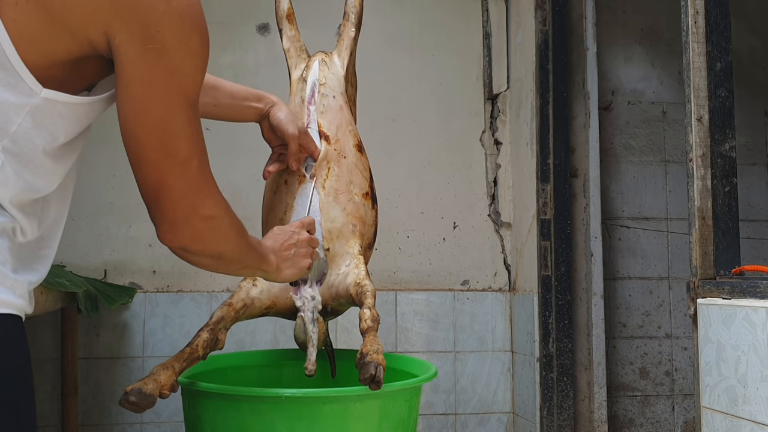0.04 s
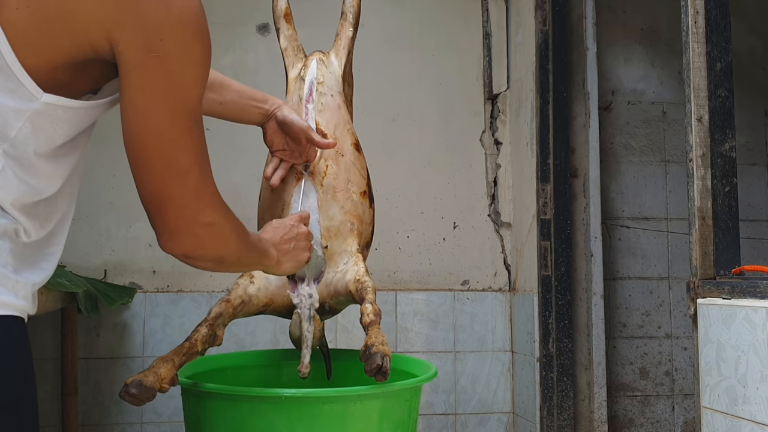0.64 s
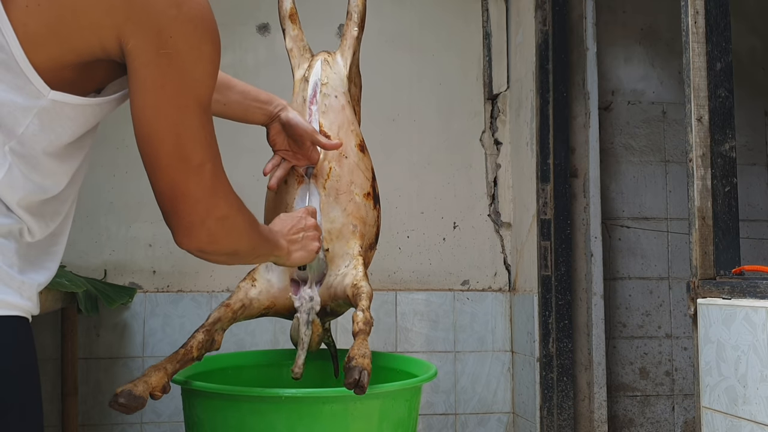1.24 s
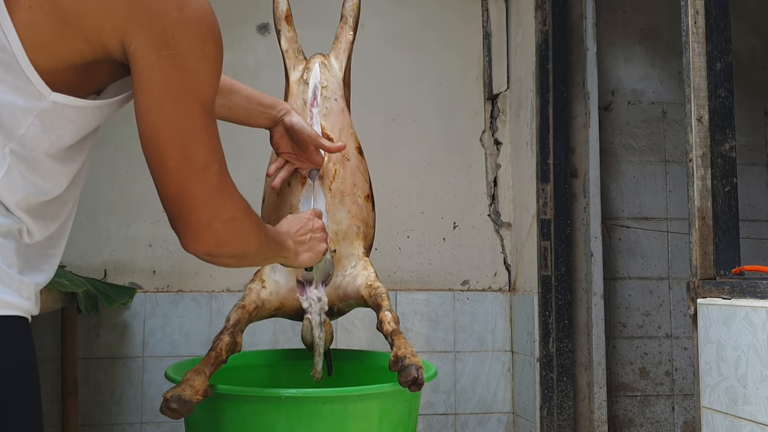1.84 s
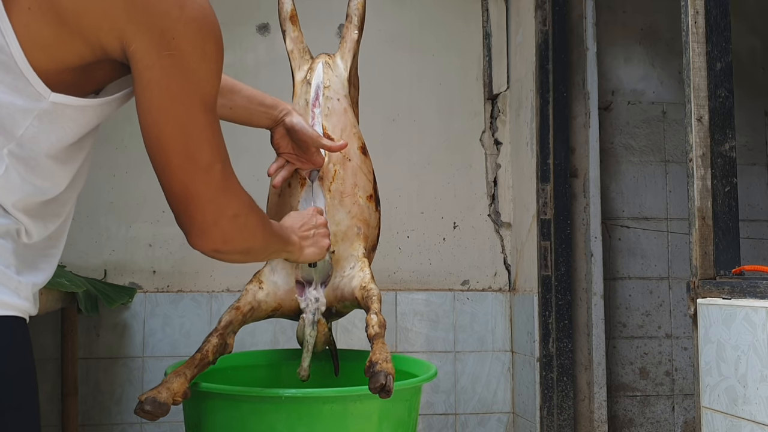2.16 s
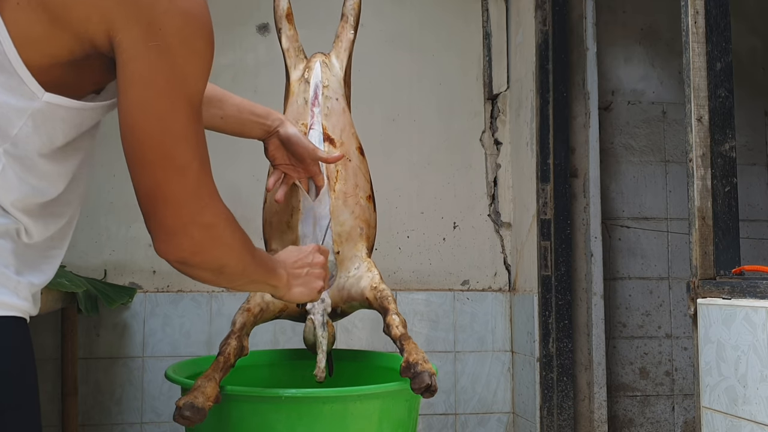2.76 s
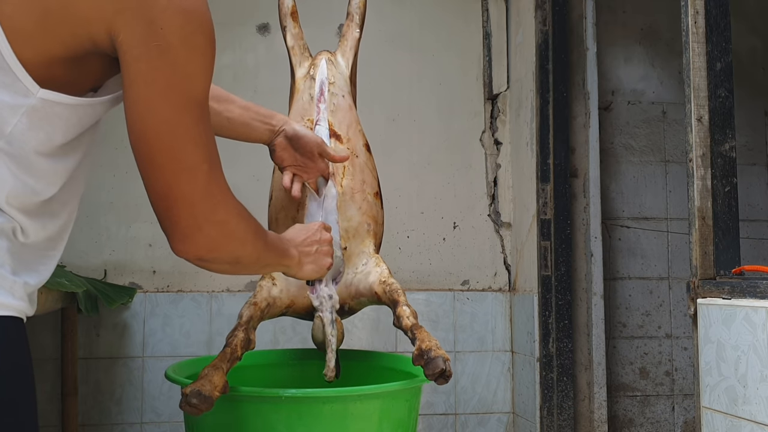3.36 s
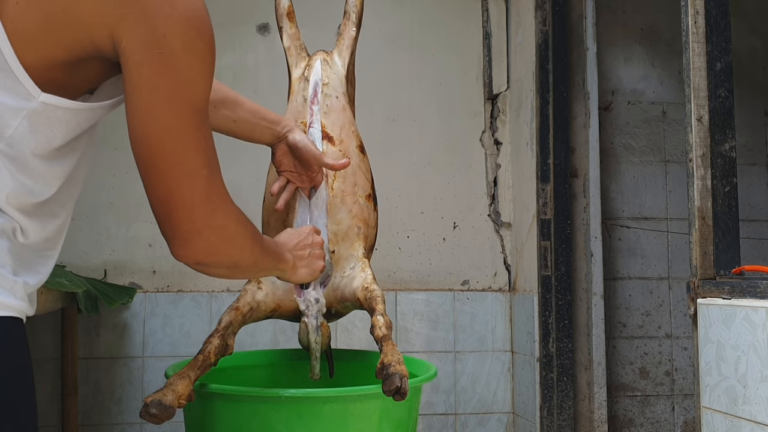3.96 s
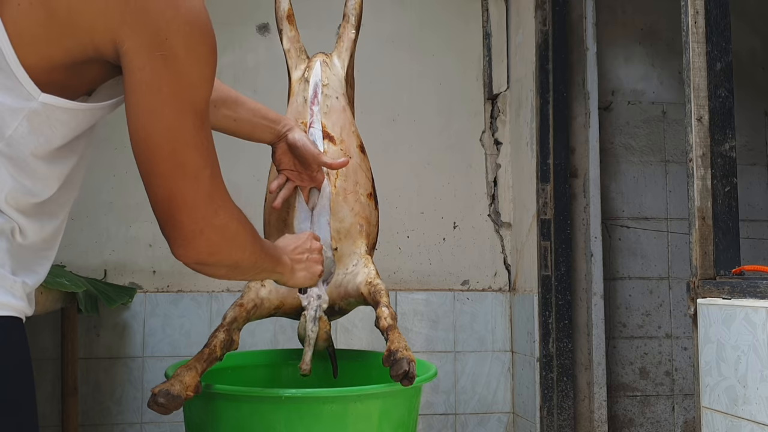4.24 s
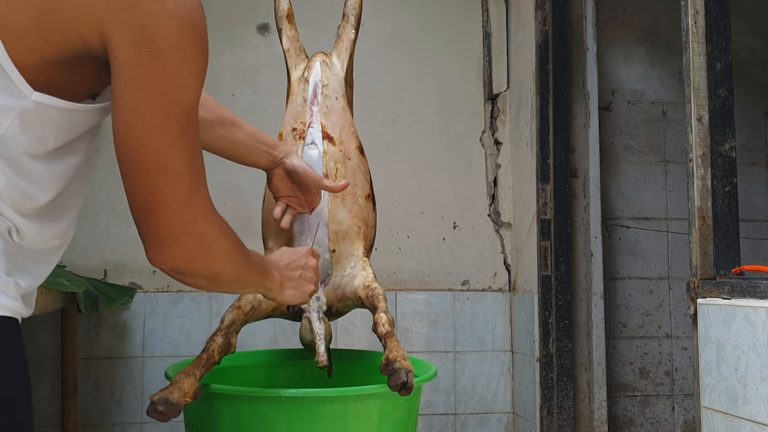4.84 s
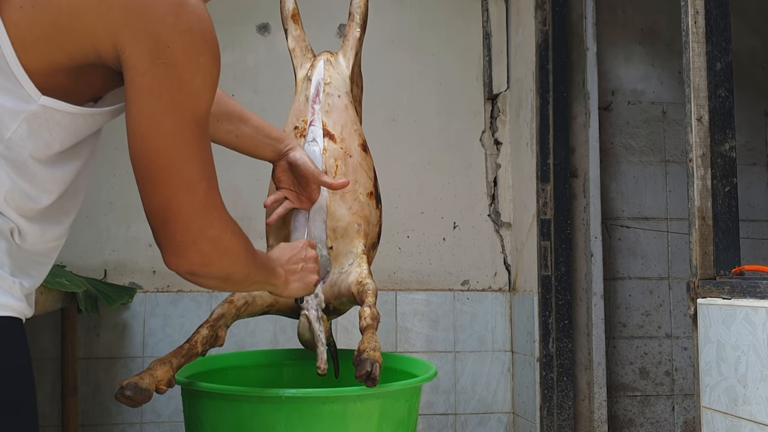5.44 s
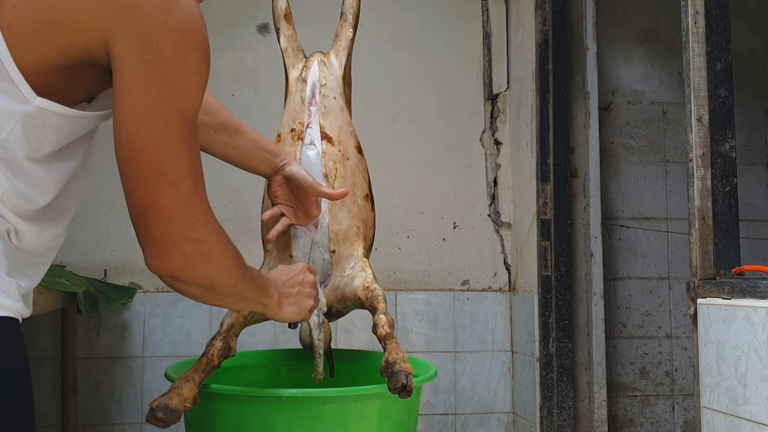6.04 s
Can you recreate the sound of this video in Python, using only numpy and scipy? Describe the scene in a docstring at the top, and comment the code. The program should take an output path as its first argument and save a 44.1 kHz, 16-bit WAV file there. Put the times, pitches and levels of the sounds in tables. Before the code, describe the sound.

A knife slits the hide of a hanging carcass in short, scratchy, slightly squeaky strokes with pauses between. Wet tissue ticks close to the microphone and a hand faintly brushes the damp coat. Midway the carcass takes one dull knock; then come two sharper tears, with a sinew popping between them. The small tiled yard adds a brief echo, and distant traffic drones low throughout.

```python
"""A small tiled yard, where a knife slits the belly hide of a hanging goat carcass, heard in stereo.
Each pull snaps a swarm of hairs and fibres that ring the blade and the opened hide; between pulls a hand
brushes the damp coat. Wet tissue ticks straight at the microphone, the carcass takes one dull knock
and a sinew gives way. The near walls answer every stroke, over the low drone of distant traffic."""
import sys
import numpy as np
from scipy import signal
from scipy.fft import rfft, irfft, next_fast_len
from scipy.io import wavfile

SR = 44100
rng = np.random.default_rng(int(sys.argv[2]) if len(sys.argv) > 2 else 0)


def store_pcm(level_fs):
    """Save levels as 16-bit WAV."""
    pcm = np.round(np.clip(level_fs, -1, 1) * 32767).astype(np.int16)
    wavfile.write(sys.argv[1], SR, np.atleast_2d(pcm).T)


N = 273861

# The deep drone of distant traffic. Each row: time in seconds, level in dB.
TRAFFIC_LEVEL = [(0.0, -44.5), (0.5, -53), (0.81, -42.5), (1.38, -51.5), (1.5, -68), (1.61, -47.5),
                 (2.13, -55), (2.27, -61.5), (2.32, -46.5), (2.52, -56.5), (2.7, -40.5), (2.87, -65.5),
                 (2.99, -47.5), (3.37, -58.5), (4.1, -50.5), (4.19, -43), (4.34, -54), (4.93, -54),
                 (5.03, -38.5), (5.26, -59), (5.31, -48), (6.11, -56), (6.14, -47.5), (6.21, -58.5)]
# A second engine drawing nearer. Each row: time in seconds, level in dB.
ENGINE_LEVEL = [(0.0, -60.5), (0.17, -69), (3.58, -58.5), (3.67, -72), (3.96, -57), (5.45, -54),
                (6.21, -61)]
# That engine's two beating notes. Each row: pitch in Hz, width in Hz, relative level in dB.
BEATING_NOTES = [(87.84, 3.3, -3.5), (92.22, 2.21, -1)]
# The roar of the far road. Each row: frequency in Hz, relative spectral level in dB.
ROAD_SPECTRUM = [(15, -22), (28, 13.5), (39, 23), (50, 16), (80, 6), (110, 1.5), (132, 8), (162, -1.5),
                 (195, -1), (330, -5), (450, -11), (900, -14.5), (1100, -22.5), (1500, -24), (3000, -52)]
# Faint steady hiss. Each row: frequency in Hz, relative spectral level in dB.
HISS_SPECTRUM = [(1000, -4), (2500, -1), (5000, -7.5), (7000, -4.5), (8200, -3.5), (9000, -18.5),
                 (15500, -12.5)]
# The blade slides over the hide, mostly just before it bites. Each row: start, rise and hold in seconds,
# force in dB, squeak pitch in Hz, relative squeak level in dB.
BLADE_SLIDES = [(0.122, .01, .06, -88.5, 1563, 9), (0.185, 0.0046, 0.0237, -70, 4578, 17),
                (0.209, 0.0054, 0.018, -69, 3827, 20.5), (0.99, 0.0205, 0.0895, -74, 1490, -5),
                (1.646, 0.041, 0.0252, -58.5, 1530, -4.5), (2.221, 0.0228, 0.0305, -63.5, 1580, 0),
                (2.492, 0.0516, 0.0284, -62.5, 1843, -11), (4.224, 0.00132, 0.025, -54, 1942, 5.5),
                (5.628, 0.0015, 0.0075, -53, 1810, -1), (5.753, 0.0065, 0.0312, -65, 1765, -16.5)]
# The pocket under the hide. Each row: multiple of its pitch, relative gain in dB.
POCKET_MODES = [(.8, -15.5), (0.998, 25.5), (1.178, -18.5)]
# The stretched hide, ringing with the pocket. Each row: frequency in Hz, width in Hz, gain in dB.
HIDE_MODES = [(1734.5, 35, -2), (2051, 51, -5)]
# The taut cut edge of the hide. Each row: frequency in Hz, width in Hz, relative gain in dB.
CUT_EDGE_MODES = [(2537, 450, -7.5), (3035, 170, -6.5), (3662, 290, -2), (4680, 200, -11)]
# The thin blade singing. Each row: frequency in Hz, width in Hz, relative gain in dB.
BLADE_MODES = [(4258, 293, 5.5), (6904, 830, -5)]
# The fizz of breaking hairs. Each row: frequency in Hz, relative spectral level in dB.
FIZZ_SPECTRUM = [(300, 14.5), (1000, -25.5), (2000, -14.5), (4500, 2.5), (5700, -2.5), (7500, 4),
                 (9200, -6.5), (11000, -3), (15500, -8.5)]
# The knife bites and tears through. Each row: start, rise and hold in seconds, fade over the hold in dB,
# force in dB, pocket pitch in Hz, relative pocket level in dB, rasp centre in Hz, relative fizz in dB.
KNIFE_CUTS = [(0.197, 0.01225, 0.0377, 10.5, -44, 1522, -4, 3210, -25),
              (1.354, 0.0418, 0.0295, 1.5, -64, 1798, 12, 2880, 1.5),
              (1.682, 0.0042, 0.0508, -3.5, -61.5, 1655, 8, 3200, -6.5),
              (1.941, 0.0207, 0.0339, 6.5, -62.5, 1625, 12, 3040, -3),
              (2.288, 0.00256, 0.0497, 15.5, -55.5, 1740, -1, 3555, 0.5),
              (2.507, 0.0527, 0.0284, 0.5, -69, 1776, -9, 4640, 8.5),
              (4.252, 0.0069, 0.0282, 10, -46.5, 1952, 10, 2470, 1),
              (4.276, 0.0152, 0.0199, 15, -45.5, 1934, -8.5, 3820, -5),
              (4.736, 0.0033, 0.07, 8.5, -61, 1330, 0.5, 4750, -5),
              (5.647, 0.0046, 0.0257, 5.5, -44.5, 1837, -4.5, 3690, -3),
              (5.676, 0.0387, 0.0242, 3.5, -53.5, 1905, -2, 3510, -5.5)]
# The hand shifts on the coat. Each row: start and length in seconds, force in dB, rasp centre in Hz.
HAND_RUBS = [(0.536, 0.123, -86.5, 11300), (2.695, 0.065, -83, 11700), (3.435, 0.3036, -79, 3140),
             (3.783, .014, -69.5, 4290), (3.942, 0.175, -79, 2370), (5.953, 0.038, -78.5, 3924)]
# Wet tissue snapping. Each row: start in seconds, relative strength in dB, pitch in Hz, width in Hz.
TISSUE_SNAPS = [(1.384, -37.5, 1830, 900), (1.685, -24.5, 1563, 348), (1.734, -31, 2400, 2500),
                (2.294, -43.5, 2400, 2500), (3.085, -29, 1446, 450), (3.295, -42.5, 1212, 600),
                (3.469, -42.5, 800, 298), (4.183, -40, 8290, 2510), (4.267, -32, 1950, 1800),
                (4.277, -20.5, 2120, 2190), (4.734, -18, 114.4, 60), (5.007, -57.5, 11200, 4000),
                (5.42, -37, 6680, 1770), (5.708, -23.5, 3610, 1500)]
# Belly air under the knock. Each row: start in seconds, level in dB, pitch in Hz, press in seconds.
BELLY_BOOMS = [(3.05, -50, 357.7, 0.0112), (3.062, -45.5, 319.6, 0.02616)]
# The knock on the carcass and its rebound. Each row: start in seconds, relative strength in dB.
CARCASS_KNOCKS = [(3.051, -34.5), (3.057, -26), (3.077, -36.5)]
# The ring of ribs and skin. Each row: frequency in Hz, width in Hz, relative level in dB.
RIB_MODES = [(606, 240, -16), (966, 86, -11), (1295, 190, -7), (1620, 330, -33.5), (2160, 730, -20.5),
             (2650, 170, -36)]
# The slap on wet skin. Each row: frequency in Hz, relative spectral level in dB.
SLAP_SPECTRUM = [(300, 2.5), (1500, 1), (3000, 6), (4000, -4.5), (7000, 0), (9300, -12), (12000, -3),
                 (15500, -11.5)]
# A sinew gives way in jerks. Each row: start in seconds, relative strength in dB.
SINEW_POPS = [(4.741, -41.5), (4.75, -37), (4.782, -25.5)]
# The ring of the sinew. Each row: frequency in Hz, width in Hz, relative level in dB.
SINEW_MODES = [(1268, 390, -5), (2865, 680, -5.5), (4790, 640, -4.5), (5760, 2180, -2.5), (6940, 1550, 2)]
# The yard's reverberation. Each row: frequency in Hz, time to fall 60 dB in seconds.
YARD_DECAY = [(300, 0.52), (1500, 0.2996), (4000, 0.2712), (8000, 0.2385), (15000, 0.2145)]
# The cutting's tone on the microphone's left side. Each row: frequency in Hz, gain over the right in dB.
LEFT_TONE = [(300, -2), (1000, -1.5), (1800, 1.5), (4000, -2), (8000, 2), (15000, 0)]


def amp(db):
    """Decibels to gain."""
    return 10 ** (np.asarray(db) / 20)


def unit(x):
    """Scales to rms 1."""
    return x / np.sqrt(np.mean(x ** 2) + 1e-20)


def at_frequency(points, hz):
    """A table read on a log-frequency axis."""
    table_hz, value = np.transpose(points)
    return np.interp(np.log(hz + 1), np.log(table_hz + 1), value)


def curve(rows):
    """A table of times and values, read at every sample."""
    return np.interp(np.arange(N) / SR, *np.transpose(rows))


def colour(x, points):
    """Shapes x with a spectrum in dB."""
    size = next_fast_len(x.shape[-1])
    gain = amp(at_frequency(points, np.fft.rfftfreq(size, 1 / SR)))
    return irfft(rfft(x, size) * gain, size)[..., :x.shape[-1]]


def resonate(x, hz, width):
    """A two-pole resonance of gain 1."""
    return signal.lfilter(*signal.iirpeak(min(hz, SR * .45), hz / width, SR), x)


def band(x, hz, width):
    """A resonance applied twice, for steep skirts."""
    return resonate(resonate(x, hz, width), hz, width)


def glide(x, hz, width):
    """A resonance that follows the curve hz, with steep skirts."""
    turn = np.exp(2j * np.pi * np.cumsum(hz) / SR)
    pole = np.exp(-np.pi * width * 1.5 / SR)
    return 2 * (turn * signal.lfilter([(1 - pole) ** 2], [1, -2 * pole, pole * pole], x / turn)).real


def play(source, rows):
    """One track with a sound for each row, placed at the row's start time."""
    track = np.zeros(N)
    for start, *settings in rows:
        sound = source(*settings)
        span = track[round(start * SR):][:len(sound)]
        span += sound[:len(span)]
    return track


def drone(hz, width, steadiness):
    """A narrow wavering band of engine rumble; steadiness evens out its swells."""
    noise = band(rng.standard_normal(N + SR), hz, width)
    rumble = signal.hilbert(noise, next_fast_len(N + SR))[SR:SR + N]
    power = abs(rumble) ** 2
    return unit(rumble.real / (power + .1 * np.mean(power)) ** (steadiness / 2))


def traffic(rise_db_per_s=1.3482):
    """Far engines in the centre, diffuse road roar whose upper range slowly grows, and faint hiss."""
    beating = sum(amp(db) * drone(hz, width, steadiness=0.36) for hz, width, db in BEATING_NOTES)
    deep = drone(hz=69, width=7.49, steadiness=0.738)
    engines = amp(curve(TRAFFIC_LEVEL)) * deep + amp(curve(ENGINE_LEVEL)) * beating
    mid, side = rng.standard_normal((2, N))
    side = colour(side, [(40, -13.5), (130, -10), (300, -10.5), (600, -5.5), (1200, 2)])  # narrow bass
    roar = unit(colour(np.array([mid + side, mid - side]), ROAD_SPECTRUM))
    bass = signal.sosfiltfilt(signal.butter(2, 330, fs=SR, output="sos"), roar)
    growth = amp(-1.5 + rise_db_per_s * np.arange(N) / SR)
    hiss = unit(colour(rng.standard_normal((2, N)), HISS_SPECTRUM))
    return engines + amp(-56.5) * (bass + growth * (roar - bass)) + amp(-83) * hiss


def pull(rise, hold, fade_db, force_db, pocket_hz, pocket_width, pocket_db, rasp_hz, rasp_db, blade_db,
         fizz_db, fibres_per_s=2400, spread_db=5.5, release_s=0.0091, octaves_per_s=0.57):
    """Fibres snap one by one and ring the hide pocket, the cut edge and the blade."""
    t = np.arange(int((rise + hold) * SR) + 2048) / SR
    held = np.clip((t - rise) / hold, 0, 1)
    release = np.exp(-np.maximum(t - rise - hold, 0) / release_s)
    force = np.minimum(t / rise, 1) * amp(-fade_db * held) * release
    chance, size, sign = rng.random((len(t), 3)).T
    strength = amp(spread_db * np.minimum(-np.log(size), 4))
    breaks = (chance < fibres_per_s / SR) * np.sign(sign - .5) * strength
    friction = 0.39 * rng.standard_normal(len(t))
    thin_flap = signal.butter(6, 1150, "high", fs=SR, output="sos")  # a thin flap radiates no bass
    drive = signal.sosfilt(thin_flap, force * (unit(breaks) + friction))
    # The hide tightens as the blade advances.
    pitch = pocket_hz * 2 ** (octaves_per_s * (t - (rise + hold) / 2))
    pocket = sum(amp(db) * glide(drive, pitch * ratio, pocket_width) for ratio, db in POCKET_MODES)
    pocket = pocket + sum(amp(db) * resonate(pocket, hz, width) for hz, width, db in HIDE_MODES)
    rasp = band(drive, rasp_hz, width=2300)
    edge = sum(amp(db) * resonate(rasp, hz, width) for hz, width, db in CUT_EDGE_MODES)
    rasp = 0.3675 * rasp + 0.265 * edge
    blade = sum(amp(db) * band(drive, hz, width) for hz, width, db in BLADE_MODES)
    fizz = colour(drive, FIZZ_SPECTRUM)
    parts = [(pocket_db, pocket), (fizz_db, fizz), (rasp_db, rasp), (blade_db, blade)]
    # Each part has its own path length to the microphone.
    sound = sum(amp(db) * unit(np.roll(part, rng.integers(60))) for db, part in parts)
    return amp(force_db) * np.sqrt(np.mean(force ** 2)) * sound


def widening(force_db, firm_db=-54):
    """Harder pulls open the pocket wider: the factor on its bandwidth, 1 for a firm pull."""
    return np.exp(0.03 * (force_db - firm_db))


def slide(rise, hold, force_db, squeak_hz, squeak_db, fade_db=1):
    """A light, even pull: the free blade sings and the pocket squeaks, purer the lighter the touch."""
    width_hz = 307 * widening(force_db)
    return pull(rise, hold, fade_db, force_db, squeak_hz, width_hz, squeak_db,
                rasp_hz=2796, rasp_db=-11, blade_db=-2, fizz_db=-2.5)


def cut(rise, hold, fade_db, force_db, pocket_hz, pocket_db, rasp_hz, fizz_db):
    """A pull that bites: the torn edge rasps and the hide damps the blade."""
    width_hz = 448.5 * widening(force_db)
    return pull(rise, hold, fade_db, force_db, pocket_hz, width_hz, pocket_db, rasp_hz,
                rasp_db=0, blade_db=-6, fizz_db=fizz_db)


def rub(length, force_db, rasp_hz):
    """A soft swell of hairs brushed by the hand, with no blade in it."""
    rise = 0.433 * length
    return pull(rise, length - rise, fade_db=8, force_db=force_db, pocket_hz=1677, pocket_width=448.5,
                pocket_db=-6.5, rasp_hz=rasp_hz, rasp_db=0, blade_db=-np.inf, fizz_db=3)


def snap(db, hz, width, crack_db=-16):
    """One sharp break in the tissue rings a tiny wet cavity."""
    click = signal.unit_impulse(2048)
    cavity = unit(band(click, hz, width))
    crack = unit(resonate(click, hz, 2 * hz))
    return amp(db - 28.5) * (cavity + amp(crack_db) * crack)


def boom(db, hz, length, swell_s=0.00091, decay_s=0.00134, linger_db=-18, linger_t60=0.67):
    """The hollow belly holds one low note while it is pressed, then lingers faintly."""
    t = np.arange(SR // 3) / SR
    press = (1 - np.exp(-t / swell_s)) * np.exp(-np.maximum(t - length, 0) / decay_s)
    linger = amp(linger_db - 60 * t / linger_t60) * np.minimum(t / length, 1)
    return amp(db) * np.maximum(press, linger) * np.sin(2 * np.pi * hz * t)


def knock(db, slap_db=-8, slap_decay_s=0.00128):
    """A wet slap on the skin and the damped ring of the ribs."""
    t = np.arange(SR // 8) / SR
    click = signal.unit_impulse(len(t))
    ribs = sum(amp(level) * unit(resonate(click, hz, width)) for hz, width, level in RIB_MODES)
    burst = rng.standard_normal(len(t)) * np.exp(-t / slap_decay_s)
    slap = unit(colour(burst, SLAP_SPECTRUM))
    return amp(db - 25) * (ribs + amp(slap_db) * slap)


def sinew_pop(db):
    """One break rings all the sinew's modes."""
    return sum(snap(db + level, hz, width) for hz, width, level in SINEW_MODES)


def echoes(size, per_s):
    """Randomly timed reflections, different on the left and the right."""
    return rng.standard_normal((2, size)) * (rng.random((2, size)) < per_s / SR)


def yard(x, direct_db=-6, echo_db=-3, early_decay_s=0.00656, tail_rise_s=0.00678):
    """What reaches the microphone: direct sound, early echoes off the near tiles and a diffuse tail."""
    size = SR // 2
    t = np.arange(size) / SR
    hz, frame_s, spectra = signal.stft(echoes(size, per_s=5000), SR, nperseg=256)
    decay = amp(-60 * frame_s / at_frequency(YARD_DECAY, hz)[:, None])
    tail = signal.istft(spectra * decay, SR, nperseg=256)[1][:, :size] * np.minimum(t / tail_rise_s, 1)
    early = echoes(size, per_s=2500) * np.exp(-t / early_decay_s) * (t > .001)
    response = amp(echo_db) * sum(p / np.linalg.norm(p, axis=1, keepdims=True) for p in (early, tail))
    response[0, 0] += amp(direct_db)
    response[1, 3] += amp(direct_db)  # the sound reaches the left side first
    return signal.fftconvolve(x[None], response, axes=1)[:, :N]


def scene():
    """The cutting in the yard, with traffic far behind; snaps face the microphone and sound drier."""
    strokes = play(cut, KNIFE_CUTS) + play(slide, BLADE_SLIDES) + play(rub, HAND_RUBS)
    knocks = play(knock, CARCASS_KNOCKS)
    snaps = play(snap, TISSUE_SNAPS) + play(sinew_pop, SINEW_POPS)
    belly = play(boom, BELLY_BOOMS)
    near = 0.242 * np.array([snaps, np.roll(snaps, 1)]) + belly
    left, right = yard(strokes + knocks + amp(-7) * snaps + 0.69 * belly) + near
    distant = traffic() * amp([[-.25], [.25]])  # a touch to the right
    return np.array([colour(left, LEFT_TONE), right]) + distant


def record(dry, cutoff_hz=15650):
    """The recorder's band limit."""
    lowpass = signal.firwin(511, cutoff_hz, window=("kaiser", 9), fs=SR)
    return signal.oaconvolve(dry, lowpass[None], "same")


dry = scene()
out = record(dry)
store_pcm(out)
```